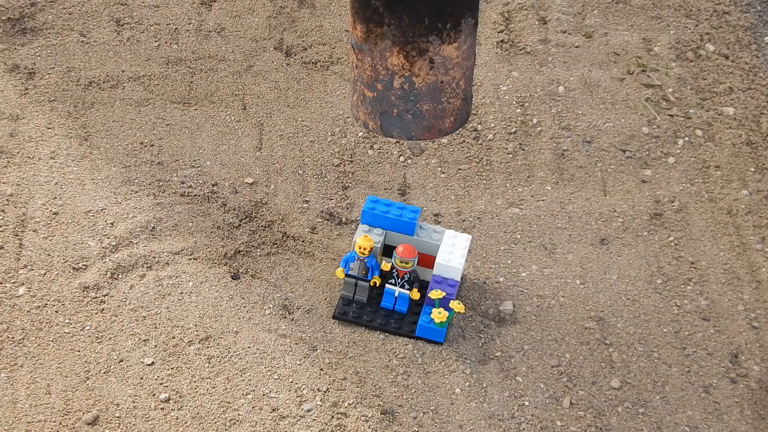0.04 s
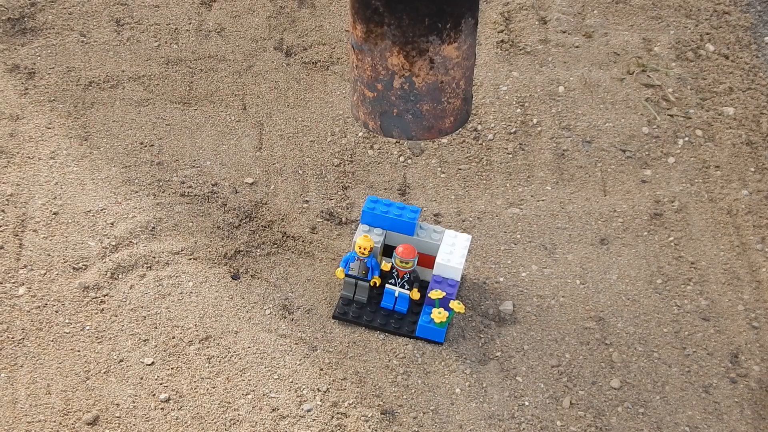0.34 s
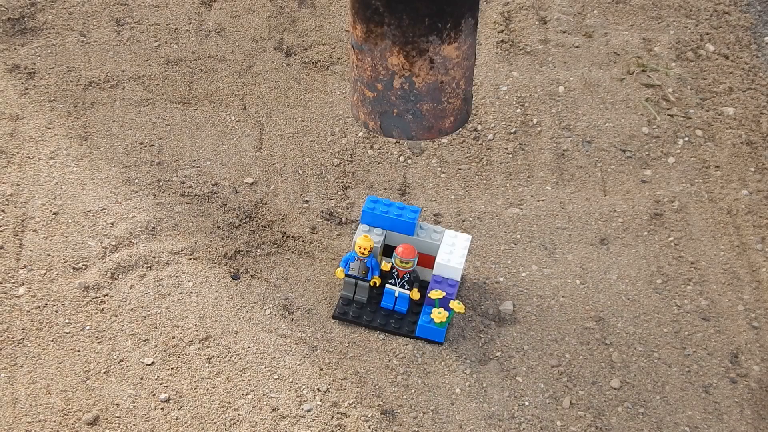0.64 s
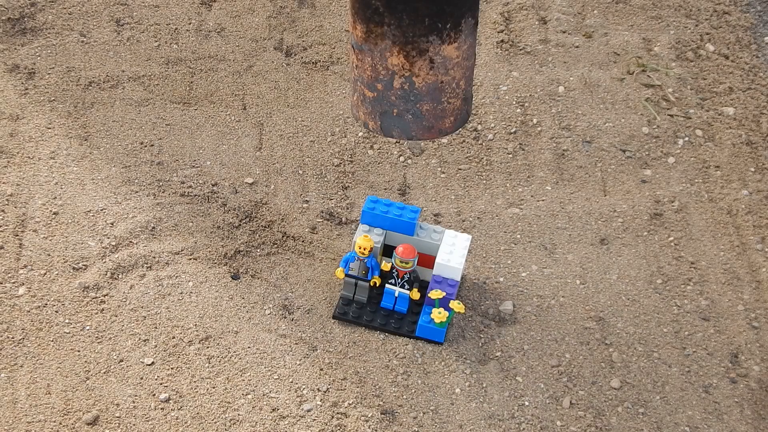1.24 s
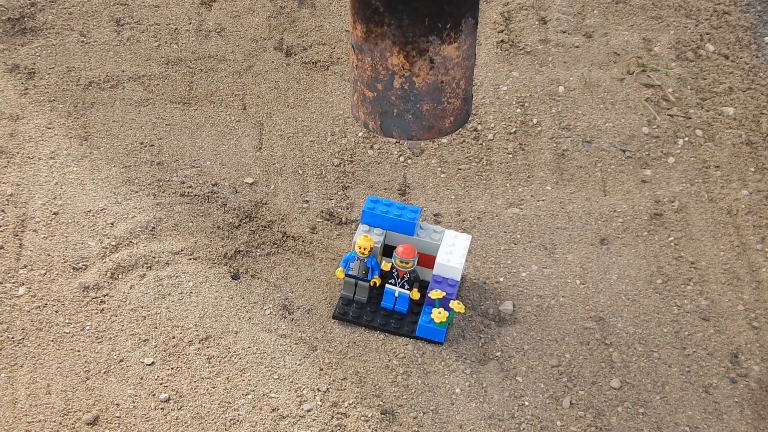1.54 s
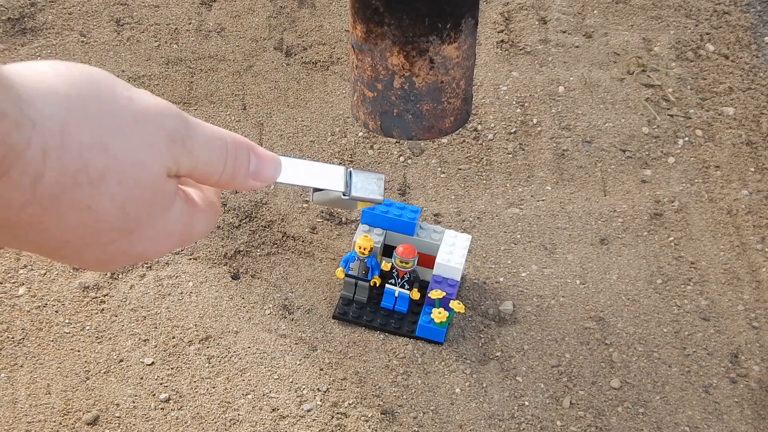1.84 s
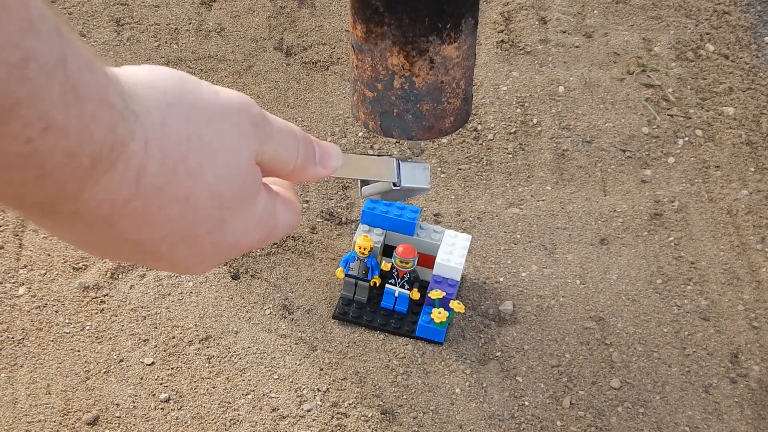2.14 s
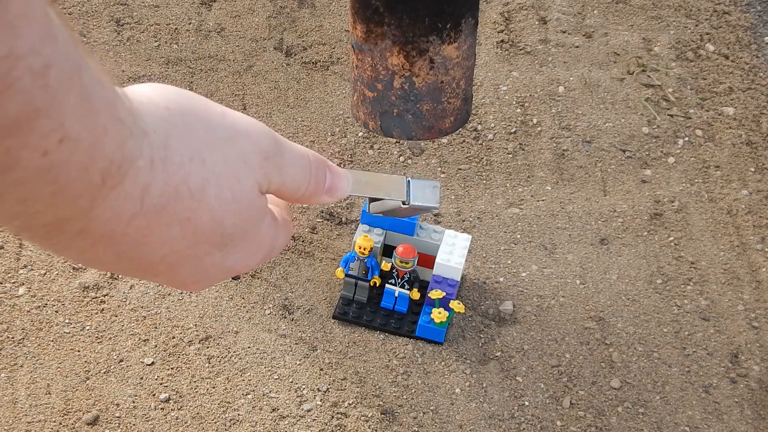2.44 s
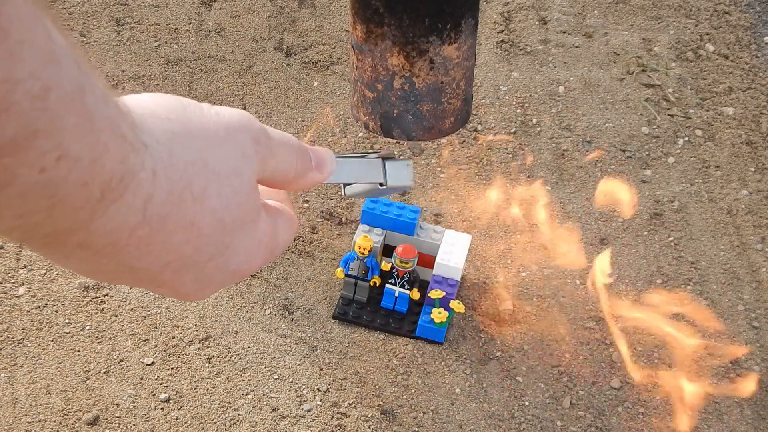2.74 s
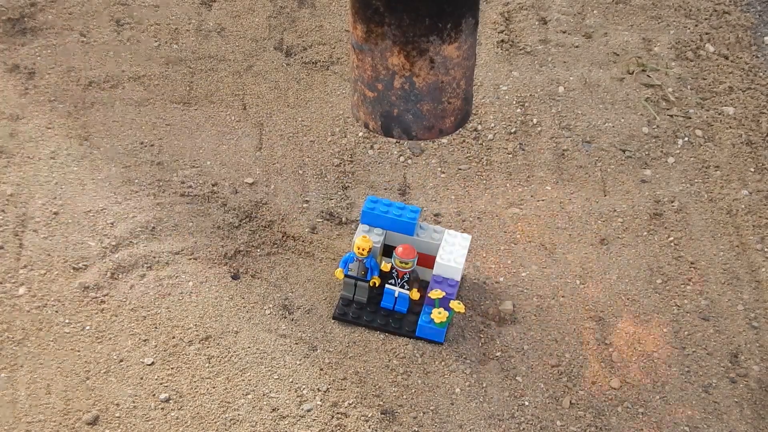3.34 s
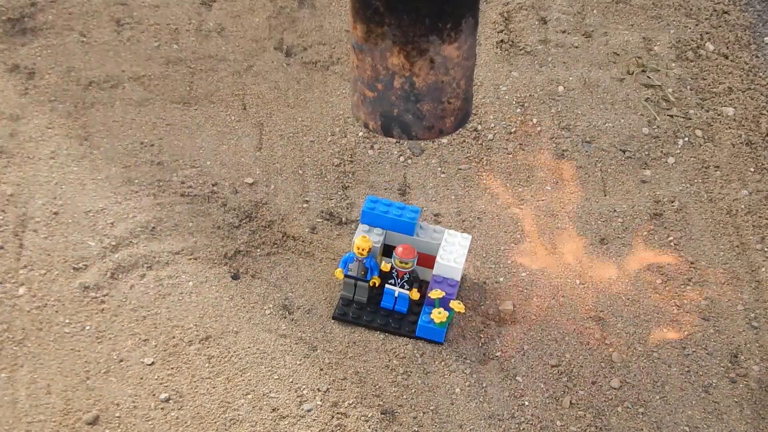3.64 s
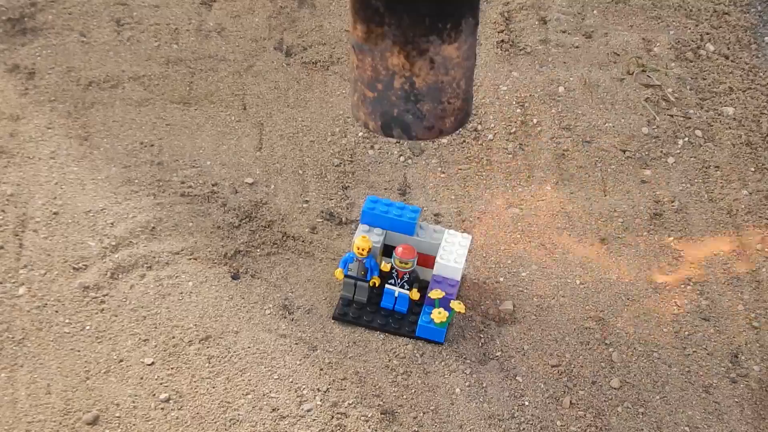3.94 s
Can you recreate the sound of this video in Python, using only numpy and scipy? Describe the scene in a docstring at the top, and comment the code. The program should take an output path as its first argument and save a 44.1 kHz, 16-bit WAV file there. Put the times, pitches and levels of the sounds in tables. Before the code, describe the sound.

A gas burner ignites nearby in the open air. First comes a thin, steady hiss and a few sharp lighter clicks, then a sudden whoomp and a rough, roaring flame with a hollow pipe howl and surges of hiss.

```python
"""Lighting a gas burner

Outdoors, over sandy ground, gas hisses from a steel pipe whose echoes reinforce evenly spaced overtones.
A lighter scrapes and clicks at its mouth. The gas catches with a whoomp, and the hot gas sweeps the
pipe's resonances upward. The turbulent flame then roars and flutters, the pipe howls,
and surges of hiss and thin whistles ride on top."""
import sys
import numpy as np
from scipy import signal
from scipy.fft import rfft, irfft
from scipy.io import wavfile
from scipy.ndimage import map_coordinates

SR = 44100
rng = np.random.default_rng(int(sys.argv[2]) if len(sys.argv) > 2 else 0)


def wav_record(signal):
    """Record a signal, one row per channel, as 16-bit PCM in the file named by sys.argv[1]."""
    frames = np.transpose(np.atleast_2d(signal))
    bounded = np.clip(frames, -1, 1)
    # unit amplitude maps onto the largest positive 16-bit level
    quanta = np.round(bounded * 32767).astype(np.int16)
    wavfile.write(sys.argv[1], SR, quanta)


N = 176400
T = np.arange(N) / SR
HZ = np.maximum(np.fft.rfftfreq(N, 1 / SR), 1)

# Envelopes of the rumbling air, the far rush and the gas jet: t/s, level/dB
AIR_LEVEL = [(0, -51), (.2, -52), (.42, -50.5), (.48, -44), (.54, -44), (.6, -51.5), (.66, -53),
             (1.48, -54), (1.58, -51), (1.88, -50.5), (2.12, -50), (2.2, -56)]
FAR_LEVEL = [(0.0, -58), (1.43, -53), (1.48, -55.5), (2.04, -56.5), (2.15, -58.5)]
JET_LEVEL = [(0.0, -38.5), (0.1, -38.5), (0.43, -37.5), (0.45, -38.5), (2.16, -37), (2.17, -37)]
# Buffets of wind: peak t/s, half width/s, level/dB
BUFFETS = [(.08, 0.21, -54.5), (.3, 0.055, -43), (.47, 0.049, -51), (1.68, .06, -57), (1.87, 0.023, -39),
           (2.03, 0.094, -52)]
# Spectra of the air, far rush, buffets and jet: f/Hz, relative density/dB
AIR_SPECTRUM = [(40, -10), (100, -1.5), (165, 1), (240, -4), (370, -9), (600, -18), (900, -28)]
FAR_SPECTRUM = [(350, -14), (600, -0.5), (810, 4), (1000, -0.5), (1500, -6), (2100, -12), (3000, -20)]
BUFFET_SPECTRUM = [(20, -18), (45, -9), (78, 1.5), (110, -8), (200, -20)]
JET_SPECTRUM = [(1400, -23), (1600, -24), (1740, -12), (2100, -25.5), (2400, -23), (2750, -17.5),
                (3200, -20), (3600, -14.5), (4100, -21), (4750, -12), (5050, -17), (5420, -14),
                (5630, -5.5), (5850, -19), (6100, -11), (6500, -1), (6800, -0.5), (7200, -13.5),
                (7750, -12), (7950, -12), (8330, 3), (8700, -10.5), (9050, -8.5), (9900, -12), (10250, 0),
                (10650, -16), (11150, -6.5), (11550, -21), (12000, -16), (13000, -23), (15000, -26),
                (15400, -22), (16000, -33)]
# The background drops away at the clicks and creeps back: t/s, gain/dB
BACKGROUND_DIP = [(2.222, -1.5), (2.235, -7), (2.27, -8.5), (2.285, -12.5), (2.42, -12), (2.47, -12),
                  (2.68, -9.5), (2.9, 1)]

# Lighter scrapes: start t/s, duration/s, level/dB
SCRAPES = [(2.181, 0.047, -40.5), (2.406, 0.037, -45.5), (2.692, .03, -37)]
# Lighter impacts: t/s, level/dB, rebound delay/s, rebound gain/dB, T60/s, ring gain/dB
CLICKS = [(2.2238, -20, .0025, -10, 0.018, -24), (2.2715, -17.5, 0.0032, -18, 0.02, -22),
          (2.4504, -22.5, .0015, -2, 0.018, -2), (2.778, -22.5, 0.0016, -7, 0.028, -20)]
# Modes of the lighter's metal case: f/Hz, relative level/dB, T60/s
CASE_MODES = [(2000, -10.5, 0.028), (5450, -8, .035), (5750, 4.5, 0.033), (6200, -27, .025),
              (12200, -8, .02)]
# Spectra of friction and impact: f/Hz, relative density/dB
SCRAPE_SPECTRUM = [(300, -7), (1200, -3), (2400, -6), (3500, 0), (7000, 2), (11000, 1), (16000, -7)]
CLICK_SPECTRUM = [(200, -25), (800, -15.5), (2600, -21), (4500, -6.5), (5800, 2), (7200, 0), (9500, -4.5),
                  (11500, 2.5), (13500, -9), (16000, -19)]

# Pressure puffs of the ignition: start t/s, duration/s, f/Hz, envelope peak/dB
PUFFS = [(2.7168, 0.0132, 194, -13.5), (2.7355, 0.0081, 215, -8)]
# Turbulent burst as the flame runs into the pipe: t/s, level/dB
BURST_LEVEL = [(2.69, -71), (2.697, -47), (2.714, -50), (2.721, -22.5), (2.741, -18.5), (2.748, -25.5),
               (2.76, -42), (2.8, -78)]
# Spectrum of that burst: f/Hz, relative density/dB
BURST_SPECTRUM = [(40, -3.5), (100, -1.5), (450, -0.5), (800, -10.5), (2000, -23), (5000, -27.5),
                  (15000, -37)]
# Pipe resonances swept by hot gas: t/s, lower f/Hz, lower level/dB, upper f/Hz, upper level/dB
PIPE_SWEEP = [(2.69, 1300, -67, 2000, -89), (2.7, 1249, -37, 2000, -68), (2.715, 1002, -66, 2000, -68),
              (2.731, 1154, -35, 2100, -32), (2.742, 1519, -26.5, 3050, -29.5),
              (2.749, 1548, -30.5, 3650, -41), (2.762, 1430, -30, 3750, -44),
              (2.78, 1305, -34.5, 3400, -51), (2.83, 1275, -40, 3000, -68), (2.9, 1270, -85, 2900, -90)]

# Envelopes of the flame's five noise bands: t/s, level/dB
ROAR_LEVEL = [(2.76, -33), (2.79, -37), (2.86, -30.5), (2.93, -25.5), (2.972, -21.5), (3.015, -31.5),
              (3.06, -23.5), (3.11, -21.5), (3.135, -23), (3.17, -20), (3.22, -23), (3.25, -19),
              (3.275, -21.5), (3.3, -20.5), (3.335, -25), (3.38, -20.5), (3.42, -17), (3.45, -21.5),
              (3.49, -19), (3.56, -19.5), (3.61, -15.5), (3.655, -19.5), (3.7, -15.5), (3.73, -23),
              (3.79, -19.5), (3.92, -18), (4.0, -21.5)]
LOWER_HOWL_LEVEL = [(2.79, -35.5), (2.81, -42), (2.826, -32), (2.974, -31), (3.024, -43.5), (3.042, -31),
                    (3.368, -34), (3.372, -29), (3.594, -32), (3.602, -31), (3.638, -33), (3.882, -26.5),
                    (3.978, -31), (4.0, -31)]
UPPER_HOWL_LEVEL = [(2.8, -47.5), (2.876, -40), (3.036, -48), (3.064, -41.5), (3.344, -43), (3.404, -30.5),
                    (3.518, -38.5), (3.724, -38), (3.876, -30.5), (4.0, -40.5)]
HISS_LEVEL = [(2.8, -44.5), (2.906, -44.5), (2.91, -36.5), (2.98, -47), (3.09, -35.5), (3.156, -48.5),
              (3.196, -46), (3.214, -39), (3.318, -49), (3.4, -35), (3.474, -35), (3.562, -52),
              (3.584, -41.5), (3.678, -54), (3.896, -32), (4.0, -44.5)]
SIZZLE_LEVEL = [(2.8, -43), (2.85, -41), (3.03, -40.5), (3.06, -34.5), (3.096, -31.5), (3.14, -47.5),
                (3.23, -37), (3.338, -47.5), (3.41, -32.5), (3.484, -34), (3.552, -40), (3.588, -37),
                (3.668, -45), (3.836, -41.5), (3.876, -32.5), (4.0, -41)]
# Spectra of those bands: f/Hz, relative density/dB
ROAR_SPECTRUM = [(25, -36), (45, -24), (70, -3.5), (150, -0.5), (230, 1.5), (300, -2.5), (350, -1.5),
                 (420, -2), (480, -15), (530, -9), (610, -7.5), (700, -20), (1000, -19.5)]
LOWER_HOWL_SPECTRUM = [(500, -27), (710, -9.5), (790, -1.5), (980, -0.5), (1190, -3.5), (1275, 10),
                       (1420, -7.5), (1540, -6.5), (1620, -6), (2100, -13.5), (2400, -11.5), (2800, -19)]
UPPER_HOWL_SPECTRUM = [(2350, -15.5), (2620, 2), (2950, -0.5), (3300, -8), (3900, -17), (4400, -13)]
HISS_SPECTRUM = [(3500, -9), (4000, -5), (4500, 1), (5600, -3), (6800, 0), (7700, -1.5), (8600, -9)]
SIZZLE_SPECTRUM = [(7200, -19), (8200, -3.5), (9400, 3.5), (10600, 0), (12400, -2.5), (14000, -8),
                   (16000, -21)]
# Gliding whistles in the flame: start t/s, duration/s, initial f/Hz, final f/Hz, level/dB
WHISTLES = [(2.782, .08, 9160, 9780, -41), (2.84, .08, 9700, 8600, -41), (2.953, 0.058, 9800, 8700, -45),
            (2.958, .07, 10400, 10050, -49), (2.98, .07, 8600, 8000, -48), (3.19, .09, 10400, 9660, -47),
            (3.216, .1, 8700, 8900, -55), (3.465, 0.12, 9200, 8500, -47), (3.67, .17, 9240, 9300, -53)]

# Stereo width of each source: f/Hz, side minus mid level/dB
AIR_SIDE = [(40, 0.5), (200, -5.5), (500, -9.5), (900, -9), (2000, -1)]
JET_SIDE = [(1500, -16.5), (3500, -10), (4200, -8.5), (4600, -17), (5600, -24), (6100, -13), (6600, -14.5),
            (7500, -6), (8300, -13), (9200, -4), (10200, -11.5), (11400, -9.5), (12500, -16), (15000, -22)]
LIGHTER_SIDE = [(300, -11), (1200, -11), (2500, -2), (4500, -4), (6500, -11), (9500, -8), (14000, -8)]
BURST_SIDE = [(60, -34), (300, -34), (700, -22), (2000, -9), (5000, -18), (14000, -13)]
FLAME_SIDE = [(50, -15), (130, -20), (250, -26.5), (500, -25), (800, -17), (1300, -10.5), (2400, -8),
              (6000, -7), (10000, -3), (15000, -2)]

LIT_S, CATCH_S = 2.735, 0.01   # when the flame takes hold, and how long it takes


def from_db(db):
    """Amplitude ratio: a factor of ten for every 20 dB."""
    return 10 ** (np.asarray(db) / 20)


def unit_rms(x):
    """Normalisation to unit mean power."""
    return x / np.sqrt(np.mean(x ** 2) + 1e-20)


def in_time(rows):
    """Linear interpolation of a table's columns at every sample."""
    times, *columns = np.transpose(rows)
    return [np.interp(T, times, column) for column in columns]


def envelope(rows):
    """Amplitude that changes exponentially between (t/s, level/dB) points."""
    return from_db(in_time(rows)[0])


def response(points):
    """Magnitude response through (f/Hz, level/dB) points on a logarithmic frequency axis."""
    hz, db = np.transpose(points)
    return from_db(np.interp(np.log(HZ), np.log(hz), db))


def noise(spectrum, width, body=1):
    """Spectral shaping of white noise into unit-power stereo, falling steeply outside the band."""
    skirts = np.minimum(1, np.minimum(HZ / spectrum[0][0], spectrum[-1][0] / HZ)) ** 4
    mid, side = rfft(rng.standard_normal((2, N))) * response(spectrum) * skirts * body
    side = side * response(width)
    return unit_rms(irfft([mid + side, mid - side], N))


def drift(corner_hz):
    """Random fluctuation: low-pass noise of unit power."""
    return unit_rms(irfft(rfft(rng.standard_normal(N)) / (1 + (HZ / corner_hz) ** 2), N))


def decay(start, t60):
    """Damping: a sudden onset, then a fall of 60 dB in each t60."""
    return (T >= start) * from_db(-60 * np.clip((T - start) / t60, 0, 4))


def resonance(hz, width_hz):
    """A resonance driven by turbulence wanders in amplitude and phase about its moving centre."""
    wander = drift(width_hz) + 1j * drift(width_hz)
    carrier = np.exp(2j * np.pi * np.cumsum(hz) / SR)
    return unit_rms(np.real(wander / np.sqrt(np.abs(wander)) * carrier))


def lit():
    """Onset of combustion: 0 while the gas is cold, 1 once it burns."""
    return np.clip((T - LIT_S) / CATCH_S, 0, 1)


def outdoors():
    """Pressure fluctuations of moving air: a rumble and buffets of wind, with a faint far rush."""
    air = envelope(AIR_LEVEL) * from_db(1.3 * drift(45)) * noise(AIR_SPECTRUM, AIR_SIDE)
    gusts = sum(from_db(db) / (1 + ((T - peak) / width) ** 2) for peak, width, db in BUFFETS)
    wind = gusts * noise(BUFFET_SPECTRUM, AIR_SIDE)
    far_rush = envelope(FAR_LEVEL) * noise(FAR_SPECTRUM, AIR_SIDE)
    return air + wind + far_rush


def gas_jet(spacing_hz=210.4, round_trip_gain=0.49, lit_db=-17.5):
    """Reflections in the cold pipe comb-filter the jet noise, which weakens once the gas burns."""
    pipe = 1 / np.abs(1 - round_trip_gain * np.exp(-2j * np.pi * HZ / spacing_hz))
    gain = envelope(JET_LEVEL) * from_db(0.28 * drift(7.3) + lit_db * lit())
    return gain * noise(JET_SPECTRUM, JET_SIDE, body=pipe)


def lighter_scrapes(ramp_s=0.0052, grit_db=2.4):
    """Friction makes short strokes of noise with a gritty, uneven level."""
    strokes = sum(from_db(db) * np.clip(np.minimum(T - start, start + length - T) / ramp_s, 0, 1)
                  for start, length, db in SCRAPES)
    return strokes * from_db(grit_db * drift(300)) * noise(SCRAPE_SPECTRUM, LIGHTER_SIDE)


def lighter_clicks(tail_db=-22.5, tail_t60=0.074):
    """Each impact rebounds once and excites the damped modes of the metal case."""
    crack = noise(CLICK_SPECTRUM, LIGHTER_SIDE)
    out = 0
    for start, db, gap, rebound_db, t60, ring_db in CLICKS:
        rebound = from_db(rebound_db) * decay(start + gap, t60)
        tail = from_db(tail_db) * decay(start, tail_t60)
        hit = decay(start, t60) + rebound + tail
        ring = sum(from_db(mode_db) * decay(start, mode_t60) * np.sin(2 * np.pi * hz * (T - start))
                   for hz, mode_db, mode_t60 in CASE_MODES)
        out += from_db(db) * (hit * crack + from_db(ring_db) * ring)
    return out


def ignition():
    """Pressure puffs and turbulence make the whoomp; hot gas raises two resonances of the pipe."""
    out = envelope(BURST_LEVEL) * noise(BURST_SPECTRUM, BURST_SIDE)
    for start, length, hz, db in PUFFS:
        swell = np.sin(np.pi * np.clip((T - start) / length, 0, 1))
        out -= from_db(db) * swell * np.sin(2 * np.pi * hz * (T - start))
    lower_hz, lower_db, upper_hz, upper_db = in_time(PIPE_SWEEP)
    out += from_db(lower_db) * resonance(lower_hz, width_hz=180)
    out += from_db(upper_db) * resonance(upper_hz, width_hz=180)
    return out * (T > BURST_LEVEL[0][0])


def chirps(per_s=78, length_s=0.03, low_hz=7800, high_hz=12600, fall_hz_per_s=8000, base_db=-46.5):
    """Faint falling tones at random times; amplitude modulation roughens them and tracks the sizzle."""
    out = np.zeros(N + SR)
    t = np.arange(int(length_s * SR)) / SR
    swell = np.sin(np.pi * t / length_s)
    burn_s = T[-1] - LIT_S
    for when, pitch, strength in rng.random((int(per_s * burn_s), 3)):
        start = int((LIT_S + when * burn_s) * SR)
        hz = low_hz + pitch * (high_hz - low_hz) - fall_hz_per_s * t
        out[start:start + len(t)] += (0.5 + strength) * swell * np.sin(2 * np.pi * np.cumsum(hz) / SR)
    sizzle_db, = in_time(SIZZLE_LEVEL)
    surge_db = sizzle_db - sizzle_db[T > LIT_S].mean()
    return from_db(base_db + surge_db + 4.1 * drift(120)) * out[:N]


def whistles():
    """Narrow-band turbulence is heard as pitch: each whistle swells, glides and fades."""
    out = 0
    for start, length, from_hz, to_hz, db in WHISTLES:
        progress = np.clip((T - start) / length, 0, 1)
        hz = from_hz + (to_hz - from_hz) * progress
        out += from_db(db) * np.sin(np.pi * progress) * resonance(hz, width_hz=70)
    return out


def hot_air_swirl(x, delay_s=0.0011, swing=0.065, echo_gain=0.54):
    """An echo through billowing hot air wanders in delay and interferes with the direct sound."""
    delay = delay_s * (1 + swing * drift(3.6))
    return np.array([ch + echo_gain * map_coordinates(ch, [(T - delay) * SR], order=3) for ch in x])


def flame(flutter_hz=57, roar_flutter_db=1.5, howl_flutter_db=0.8, hiss_flutter_db=1.34):
    """Turbulent combustion: one flutter modulates the low roar, the hot pipe's howl and the hiss."""
    flutter = drift(flutter_hz)
    roar = from_db(roar_flutter_db * flutter) * noise(ROAR_SPECTRUM, FLAME_SIDE)
    roar = envelope(ROAR_LEVEL) * unit_rms(roar)
    howl = envelope(LOWER_HOWL_LEVEL) * noise(LOWER_HOWL_SPECTRUM, FLAME_SIDE)
    howl += envelope(UPPER_HOWL_LEVEL) * noise(UPPER_HOWL_SPECTRUM, FLAME_SIDE)
    howl *= unit_rms(from_db(howl_flutter_db * flutter + 1.1 * drift(170)))
    hiss = envelope(HISS_LEVEL) * noise(HISS_SPECTRUM, FLAME_SIDE)
    sizzle = envelope(SIZZLE_LEVEL) * noise(SIZZLE_SPECTRUM, FLAME_SIDE)
    treble = hot_air_swirl(hiss + sizzle)
    treble *= from_db(hiss_flutter_db * flutter + 0.55 * drift(250) - 0.5)
    return lit() * (roar + howl + treble)


def scene():
    """Superposition of gas, lighter, ignition and flame in the open air."""
    background = (gas_jet() + outdoors()) * envelope(BACKGROUND_DIP)
    lighter = lighter_scrapes() + lighter_clicks()
    return background + lighter + ignition() + flame() + whistles() + chirps()


def record(dry, notch_width_hz=80, cutoff_hz=15900):
    """Filtering: five narrow notches, then a steep low-pass that cuts the highest treble."""
    for hz in (2500, 4000, 5000, 7500, 10000):
        dry = signal.lfilter(*signal.iirnotch(hz, hz / notch_width_hz, fs=SR), dry)
    return signal.sosfilt(signal.ellip(10, 0.2, 80, cutoff_hz, fs=SR, output="sos"), dry)


dry = scene()
out = record(dry)
wav_record(out)
```